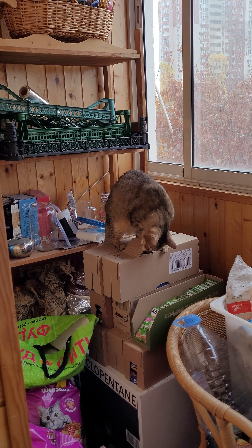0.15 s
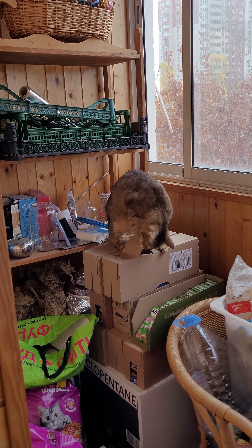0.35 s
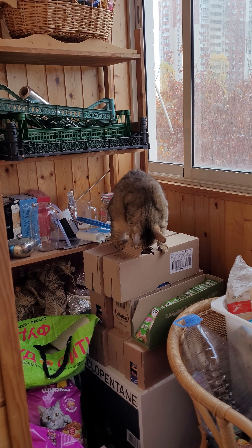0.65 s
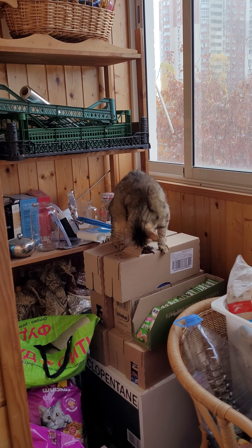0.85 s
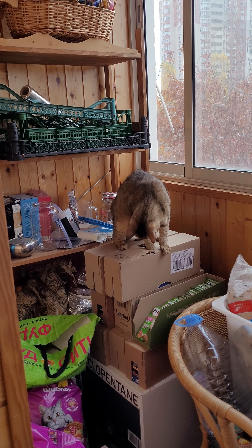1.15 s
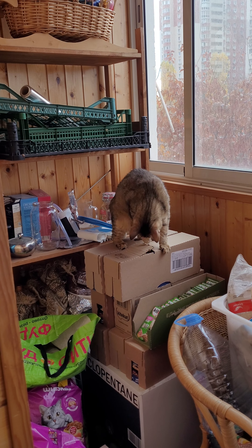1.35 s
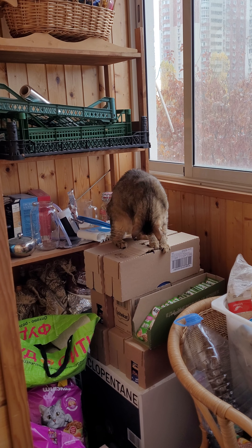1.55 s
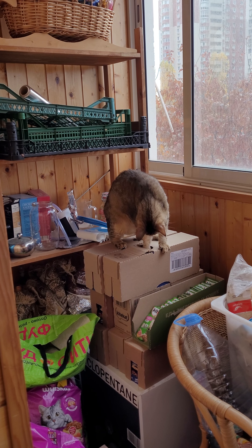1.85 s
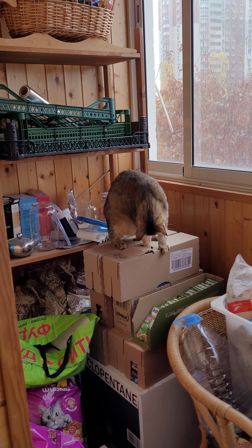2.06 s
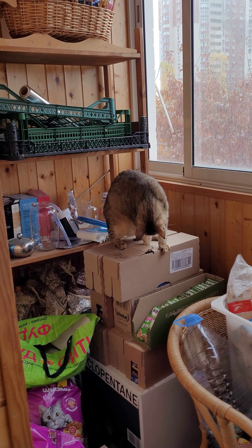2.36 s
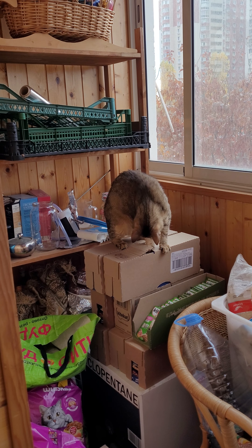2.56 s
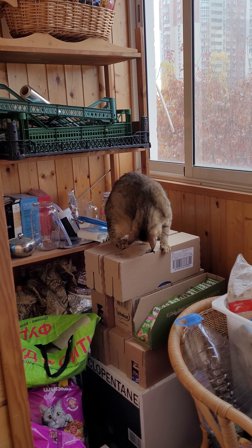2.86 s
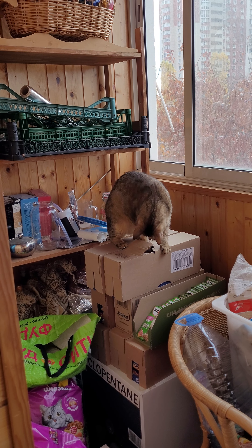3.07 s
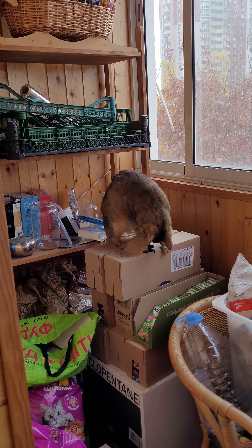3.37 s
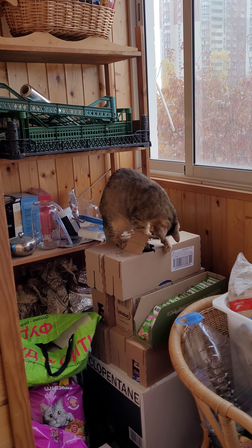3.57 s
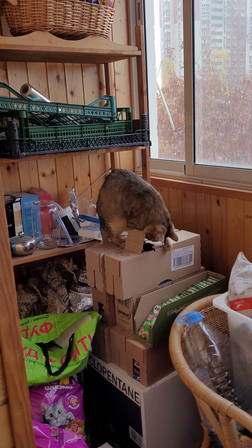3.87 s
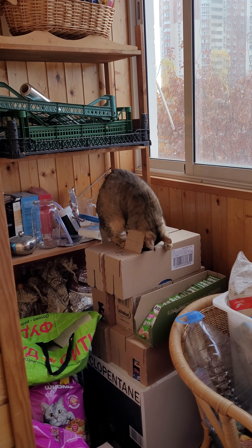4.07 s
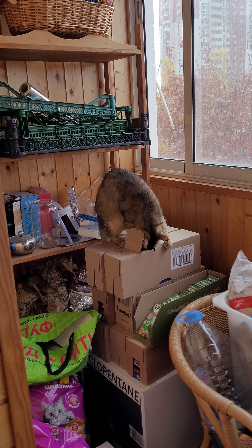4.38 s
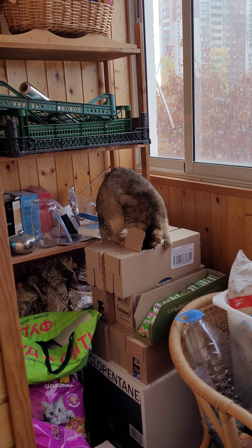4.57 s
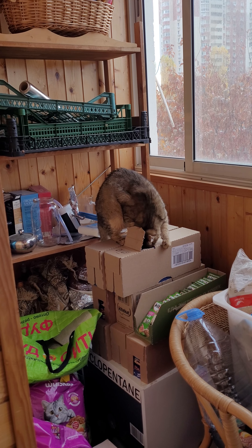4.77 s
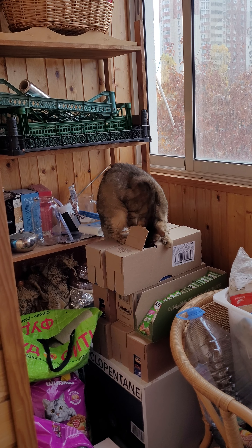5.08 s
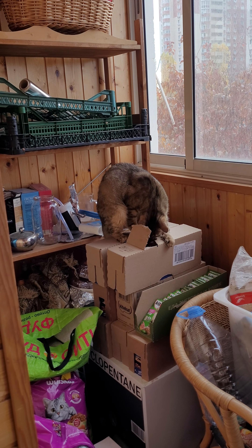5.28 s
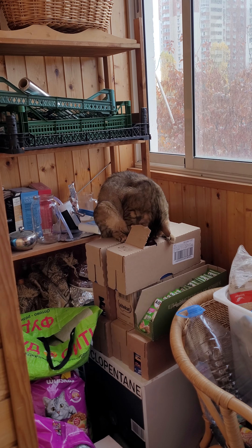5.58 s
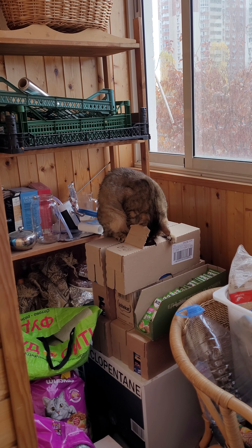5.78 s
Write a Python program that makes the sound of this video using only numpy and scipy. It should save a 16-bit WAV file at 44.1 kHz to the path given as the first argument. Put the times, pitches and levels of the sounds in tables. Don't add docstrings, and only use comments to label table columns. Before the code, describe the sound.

On a small wood-lined balcony, a cat works at a hollow cardboard box about two metres from a stereo microphone. Faint clicks, taps and claw drags come first, then two heavy boomy blows at one second. Scrapes and snapping fibres continue irregularly, turning into a hard flurry with a sharp crack near the end and three quick final thumps. Faint traffic rumble and hum lie beneath.

```python
import sys
import numpy as np
from scipy import signal
from scipy.fft import rfft, irfft, next_fast_len
from scipy.io import wavfile
from scipy.ndimage import uniform_filter1d, map_coordinates

SR = 44100
rng = np.random.default_rng(int(sys.argv[2]) if len(sys.argv) > 2 else 0)


def volts_from_db(level):
    exponent = np.asarray(level, float) / 20
    return 10 ** exponent


def store_pcm(level_fs):
    pcm = np.round(np.clip(level_fs, -1, 1) * 32767).astype(np.int16)
    wavfile.write(sys.argv[1], SR, np.atleast_2d(pcm).T)


N = 261513
SPAN = 1 << 14

# (time [s], crack peak [dB], panel over crack [dB], fizz over crack [dB], crack centre [Hz])
OPEN_TICKS = [(.1012, -53, -9, -1, 6100), (.6066, -55.5, 8.5, -10, 3800), (.806, -70, 14, 9, 7100),
              (1.4663, -63, 8, 6, 7060), (1.7813, -43, 8.5, -0.5, 3460), (3.5985, -44, 3.7, 6, 3700),
              (4.2041, -39, -5.5, -12, 3860), (4.4998, -56, 5, -11, 6800), (4.5089, -47.5, 1.5, 7, 3960),
              (5.171, -41, -17, 1, 5470), (5.4037, -20, -1.5, -8.5, 3480)]
SHADED_TICKS = [(.2416, -56, -4, 2, 6350), (.270, -51.5, -1, 3.5, 3700), (.4495, -47, 8, -8, 4370),
                (.999, -34, 7, 0.5, 3540), (1.0125, -28.5, 5.5, 2.5, 3600), (2.5579, -38.5, 5, -13, 3700),
                (3.1347, -34, 4.5, -11.5, 2950), (4.950, -67, 0, 8, 2600), (5.134, -53.5, 0, 6.5, 3800),
                (5.2661, -56.5, 14.5, 6, 3500), (5.3921, -42, -2, -5, 7500), (5.6237, -57, 3.5, 1, 6200),
                (5.8925, -25.5, 0.1, -3, 2800)]
RIPS = [(0.748, -86, 15, -12, 7000), (0.9096, -59, 0, -1, 3820), (0.988, -40, 1, -4, 4900),
        (1.256, -58.5, 8, -1, 4200), (1.273, -56, -10, 0.5, 3880), (1.518, -58.5, 10.5, -7, 4430),
        (2.468, -67, 12, 9, 5300), (2.739, -51.5, 1, -8, 3340), (2.796, -48, -2.5, -12, 3180),
        (3.096, -45, 2, -5, 2670), (3.2844, -60, -15, 1, 5800), (4.717, -68.5, 10, 13, 6300),
        (4.8376, -63, 13, -4, 5900), (5.1921, -31.5, -7, 0, 7340), (5.297, -45.5, 4.5, -5, 6200),
        (5.377, -49, 11, -17, 6100), (5.8771, -32.5, 4, 3, 3800)]
# (time [s], crack peak [dB], fizz over crack [dB], crack centre [Hz], length [s])
SCRAPES = [(0.107, -53, 3.5, 7060, 0.023), (1.554, -59, 1, 4450, 0.055), (1.612, -52.5, -4.5, 4470, 0.042),
           (1.737, -48.5, -3, 3500, 0.022), (1.855, -60.5, 2.5, 3730, 0.06), (2.398, -66.5, 0, 6400, 0.1),
           (2.599, -45, -4.5, 2870, 0.012), (2.702, -69, 11, 6700, 0.014), (2.998, -51.5, -8, 7060, 0.042),
           (3.329, -53.5, -3, 3870, 0.0072), (3.355, -42, -9, 3470, 0.011), (3.401, -44, -7.5, 3320, 0.027),
           (3.714, -41, -12, 3400, 0.019), (4.123, -49, -15, 3640, 0.046), (4.305, -47, -5, 2720, 0.029),
           (4.354, -51, -22, 2600, 0.0075), (4.523, -51, 2, 2800, 0.079), (4.568, -53.5, 8.5, 6300, 0.042),
           (4.796, -67, 9, 6900, 0.031), (4.997, -52.5, 0.5, 2550, 0.055), (5.082, -49.5, 2, 2570, 0.032),
           (5.196, -80, 6, 6500, 0.022), (5.284, -40, -18, 3030, 0.029)]
# (time [s], pressure [dB], sharpness [dB], body weight [dB])
DRAG = [(0.0, -71, -2.5, -59.5), (0.88, -73, -7, -61.5), (1.06, -60, -15, -54), (1.47, -78, -2, -59),
        (1.73, -57.5, 2, -50.5), (1.96, -76.5, -10, -65), (2.41, -78, -7, -63.5), (2.68, -61, 4, -57),
        (2.86, -88, -15, -64), (3.07, -53, 4, -52.5), (3.22, -61, -2.5, -54), (4.05, -67.5, 0.7, -62.5),
        (4.49, -58.5, 3.5, -58), (4.89, -67.5, 4.5, -60), (5.05, -62, -5, -53.5), (5.28, -44.5, 7, -43.5),
        (5.61, -56, 7.2, -60), (5.93, -55, 10, -53)]
DRAG_LEVELS = [-5, 1.5, -1]
DRAG_GROWTH = [0.93, 1, 0.37]
# (time [s], peak [dB], struck near [Hz], stack over box [dB])
BLOWS = [(0.995, -14.5, 470, -21), (1.008, -10.5, 557, -13.5), (2.555, -28.5, 323, -46),
         (3.131, -22, 760, -47), (3.147, -26, 557, -45), (5.259, -36, 423, -43), (5.291, -40, 596, -34),
         (5.318, -34.5, 740, -21), (5.402, -24, 290, -40), (5.885, -17.5, 430, -36),
         (5.891, -14.5, 626, -19.5), (5.897, -10.5, 380, -22)]
# (time [s], peak [dB], struck near [Hz])
TAPS = [(0.122, -44, 570), (0.265, -44.5, 230), (0.443, -39, 776), (0.606, -46, 788), (1.276, -40.5, 436),
        (1.47, -50, 274), (1.523, -48, 340), (1.64, -45.5, 684), (1.757, -39, 377), (1.777, -36, 665),
        (1.79, -41, 300), (1.878, -41, 297), (2.469, -38.5, 370), (2.611, -45, 570), (3.098, -37, 520),
        (3.41, -40, 790), (3.592, -42.5, 861), (3.727, -48, 730), (4.2, -53, 352), (4.328, -42, 710),
        (4.356, -44.5, 607), (4.404, -47, 310), (4.495, -42.5, 430), (4.543, -38.5, 270), (4.595, -44, 680),
        (4.718, -38, 550), (4.835, -36.5, 464), (4.891, -44.5, 334), (5.099, -41, 312), (5.194, -35.5, 527)]
# (frequency [Hz], level [dB per Hz])
BOARD = [(530, 25), (900, 11), (1060, 1.5), (1490, 2.5), (1910, -3.5), (2260, -2), (2900, -12), (3440, -12),
         (4370, -13.5), (7130, -10), (8630, -18), (14300, -13), (15700, -17)]
VOICE_EDGES = [950, 2500, 8900]
# (frequency [Hz], width [Hz], level [dB])
FLAPS = [(1276, 370, 3), (1675, 170, 3.5)]
# (frequency [Hz], width [Hz], level [dB])
BOX_MODES = [(198, 51, -5.5), (306.7, 36, 1), (386.2, 50, -2.5), (436, 37, 4), (499.2, 64, -1.5),
             (569.5, 34, 2.5), (658, 73, 1), (760, 52, 0)]
# (frequency [Hz], width [Hz], level [dB])
STACK_MODES = [(55, 5.1, 15.5), (107.5, 14, 16.5), (139, 62, 15)]
# (time [s], level [dB])
TRAFFIC = [(0.0, -66), (0.83, -66.5), (1.02, -60), (1.42, -64.5), (1.7, -56), (2.13, -68.5), (2.58, -58),
           (2.99, -70), (3.35, -62), (4.0, -69.5), (4.33, -65), (5.93, -63.5)]
# (frequency [Hz], level [dB per Hz])
TOWN_COLOUR = [(20, -11), (55, -5.5), (88, -18.5), (110, -1), (135, 4), (220, -2), (300, 3.5), (540, -13.5),
               (800, -8), (1400, -15.5), (2100, -41), (3000, -54), (6500, -32.5), (8600, -41.5),
               (13000, -63), (16000, -43)]
# (frequency [Hz], width [Hz], level [dB])
WHINE = [(3700, 110, 15), (5030, 300, 11.5), (6850, 830, 2.5)]
# (frequency [Hz], width [Hz], rms level [dB])
HUM_TONES = [(134.4, 4.4, -73), (296, 17, -76.5), (831, 2.5, -67), (867, 3.4, -78.5)]
# (frequency [Hz], likeness [0 to 1])
ALIKE = [(60, 0.91), (250, 0.87), (600, 0.47), (1200, 0.027), (5000, 0.092), (14000, 0.085)]
# (frequency [Hz], left minus right [dB])
PORT_BALANCE = [(60, -4), (110, -1), (200, -2), (380, -2), (700, -1.5), (1290, -0.5), (2380, -3.5),
                (4400, -5.5), (8120, -8), (15000, -10)]


def ticks():
    out, hz = empty_track()
    for rows, wall_db in ((OPEN_TICKS, 5.5), (SHADED_TICKS, 11)):
        for s, db, panel_db, fizz_db, crack_hz in rows:
            push = walls(SPAN, wall_db, t60=0.21)
            levels_db = db - 0.8 + np.array([0, panel_db, fizz_db])
            add(out, s, push, voices(hz, crack_hz), levels_db)
    return out[:, :N]


def snaps():
    out, hz = empty_track()
    rip_s = 0.0055
    rows = [(*rip, rip_s) for rip in RIPS]
    for s, db, fizz_db, crack_hz, length in SCRAPES:
        panel_db = -2.5 - 5 * np.log2(crack_hz / 4000)
        rows.append((s, db, panel_db, fizz_db, crack_hz, length))
    for s, db, panel_db, fizz_db, crack_hz, length in rows:
        push = fibres(length) * walls(SPAN, wall_db=14, t60=0.26)
        levels_db = db - 3.0 + np.array([0, panel_db, fizz_db])
        add(out, s, push, voices(hz, crack_hz), levels_db)
    return out[:, :N]


def drag():
    size = next_fast_len(N + SPAN)
    hz = np.fft.rfftfreq(size, 1 / SR)
    catches = (rng.random(N) < 1500 / SR) * volts_from_db(3 * np.clip(wobble(30), -2, 2))
    scratch = (catches + 0.031) * rng.standard_normal(N)
    claws = rfft(scratch, size) * walls(size, wall_db=6.9, t60=0.083)
    rub = rng.standard_normal((2, N)) * volts_from_db(3.2 * wobble(25))
    weight = spread(rfft(rub, size), hz)
    parts = [*(claws * voices(hz, 3620)[:, None]), weight * box(hz, 503)]

    pressure_db, sharp_db, weight_db = curves(DRAG)
    levels = []
    for db, grows, lean in zip(DRAG_LEVELS, DRAG_GROWTH, (0, -0.5, 1)):
        levels.append(-66.5 + db + grows * (pressure_db + 65) + lean * sharp_db)
    levels.append(weight_db - 3.5)
    return sum(volts_from_db(db) * unit(irfft(part, size)[:, :N]) for db, part in zip(levels, parts))


def knocks():
    out, hz = empty_track()
    stack = sum(volts_from_db(db) * ring(hz, c, w) for c, w, db in STACK_MODES)
    tap_stack_db = -25
    rows = BLOWS + [(*tap, tap_stack_db) for tap in TAPS]
    for s, db, struck_hz, stack_db in rows:
        push = fibres(0.0015) * walls(SPAN, wall_db=-1.5, t60=0.22)
        parts = np.array([box(hz, struck_hz), stack])
        add(out, s + 0.002947, push, parts, db - 4.5 + np.array([0, stack_db + 5.0]))
    return out[:, :N]


def fibres(length):
    u = np.arange(SPAN) / SR / max(length, 2e-5)
    sizes = volts_from_db(8.5 * rng.standard_normal(SPAN))
    swell = (1 - np.exp(-15 * u)) * np.exp(-u * u * u)
    return 1 + 0.52 * rfft(rng.standard_normal(SPAN) * sizes * swell)


def voices(hz, crack_hz):
    box_top, panel_top, crack_top = VOICE_EDGES
    fizz_gap = 1.135
    crack = high(hz, 0.95 * panel_top) * low(hz, crack_top / fizz_gap)
    crack = crack * (0.22 + abs(ring(hz, crack_hz, 0.3 * crack_hz)))
    flaps = 1 + sum(volts_from_db(db) * ring(hz, c, w) for c, w, db in FLAPS)
    panel = high(hz, box_top) * low(hz, 0.98 * panel_top) * flaps
    fizz = high(hz, fizz_gap * crack_top)
    return volts_from_db(along(BOARD, hz)) * np.array([crack, panel, fizz])


def box(hz, struck_hz):
    total = 0
    for k, (c, w, db) in enumerate(BOX_MODES):
        share = 1 / (1 + (np.log2(c / struck_hz) / 0.75) ** 2)
        delay_s = 0.00783 / (1 + (c / 450) ** 6)
        late = np.exp(-2j * np.pi * hz * delay_s)
        total = total + (-1) ** k * share * late * volts_from_db(db) * ring(hz, c, w)
    return total * low(hz, 0.75 * VOICE_EDGES[0])


def walls(size, wall_db, t60):
    t = np.arange(SPAN) / SR
    room = volts_from_db(-60 * t / t60) * np.clip(t / 0.0015, 0, 1)
    shelves = 0.61 * volts_from_db(-60 * t / 0.0076)
    tail = rng.standard_normal((2, SPAN)) * (room + shelves)
    tail = rfft(tail / np.linalg.norm(tail[0]), size)
    return 1 + volts_from_db(wall_db) * spread(tail, np.fft.rfftfreq(size, 1 / SR))


def town():
    size = next_fast_len(N)
    hz = np.fft.rfftfreq(size, 1 / SR)
    noise = spread(rfft(rng.standard_normal((2, size))), hz) * volts_from_db(along(TOWN_COLOUR, hz))
    noise = noise * (1 + sum(volts_from_db(db) * abs(ring(hz, c, w)) ** 2 for c, w, db in WHINE))
    deep = 1 / (1 + (hz / 90) ** 8)
    dull = 1 / (1 + (hz / 230) ** 6)
    rumble, traffic, air = (unit(irfft(noise * g, size)[:, :N]) for g in (deep, dull - deep, 1 - dull))

    traffic_db, = curves(TRAFFIC)
    deep_db = -72.5 + 0.3 * (traffic_db - traffic_db.mean())
    rumble = volts_from_db(deep_db + 1.5 * wobble(9.2)) * rumble
    traffic = volts_from_db(traffic_db + 1.0 * wobble(8.9)) * traffic
    air = volts_from_db(-60 + 1.44 * wobble(4.02)) * air
    return rumble + traffic + air


def hum():
    t = np.arange(N) / SR
    total = 0
    for hz, width, db in HUM_TONES:
        drift = np.cumsum(width / 2 * wobble(3 * width)) / SR
        tone = np.sin(2 * np.pi * (hz * t + drift))
        total = total + np.sqrt(2) * volts_from_db(db + 1.5 * wobble(2.78)) * tone
    return total


def empty_track():
    return np.zeros((2, N + SPAN)), np.fft.rfftfreq(SPAN, 1 / SR)


def add(out, s, push, parts, levels_db):
    heard = irfft(push * parts[:, None], SPAN)[..., :SPAN - 2048]
    power = np.mean(heard ** 2, 1)
    peak = np.sqrt(uniform_filter1d(power, size=128, axis=1).max(1))
    out[:, round(s * SR):][:, :heard.shape[-1]] += np.tensordot(volts_from_db(levels_db) / peak, heard, 1)


def spread(pair, hz):
    turn = np.arccos(np.clip(along(ALIKE, hz), -1, 1)) / 2
    mid, side = pair[0] * np.cos(turn), pair[1] * np.sin(turn)
    return np.array([mid + side, mid - side])


def ring(hz, centre, width):
    return 1j * hz * width / (centre ** 2 - hz * hz + 1j * hz * width)


def low(hz, edge):
    return 1 / (1 + 1j * np.sqrt(2) * hz / edge - (hz / edge) ** 2) ** 2


def high(hz, edge):
    return low(hz, edge) * (hz / edge) ** 4


def unit(x):
    return x / np.sqrt(np.mean(x ** 2) + 1e-20)


def along(points, hz):
    f, v = np.transpose(points)
    return np.interp(np.log(hz + 1), np.log(f + 1), v)


def curves(rows):
    s, *cols = np.transpose(rows)
    return [np.interp(np.arange(N) / SR, s, c) for c in cols]


def wobble(rate):
    knots = rng.standard_normal(int(N * rate / SR) + 4)
    return map_coordinates(knots, [np.arange(N) * rate / SR])


def scene():
    return ticks() + snaps() + knocks() + drag() + town() + hum()


def roll_off(x):
    return signal.sosfilt(signal.butter(12, 16990, fs=SR, output="sos"), x)


def record(dry):
    size = next_fast_len(N + SPAN)
    hz = np.fft.rfftfreq(size, 1 / SR)
    lean = along(PORT_BALANCE, hz) / 2
    band_edge_db = -24 * np.clip((hz - 15750) / 150, 0, 1)
    notch_db = -6 * abs(ring(hz, 8720, 680)) ** 2
    gain = volts_from_db(np.array([lean, -lean]) + band_edge_db + notch_db) * (hz < 16900)
    ports = irfft(rfft(dry, size) * gain, size)[:, :N]
    return roll_off(ports)


dry = scene()
out = record(dry)
store_pcm(out)
```